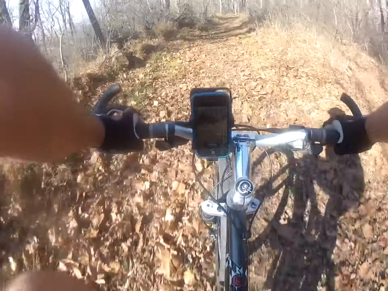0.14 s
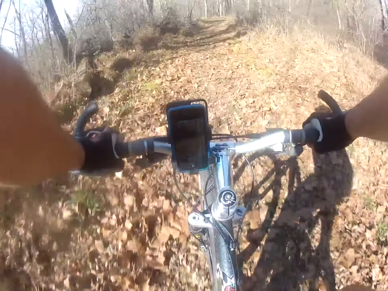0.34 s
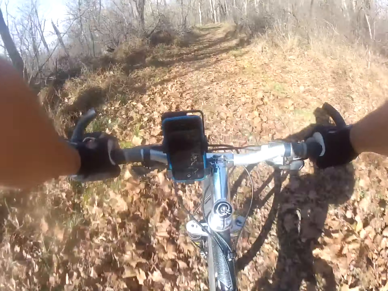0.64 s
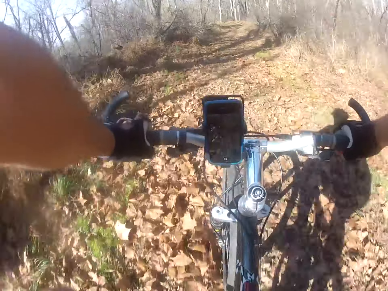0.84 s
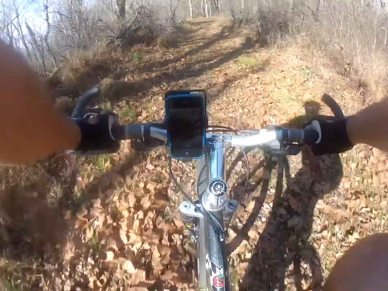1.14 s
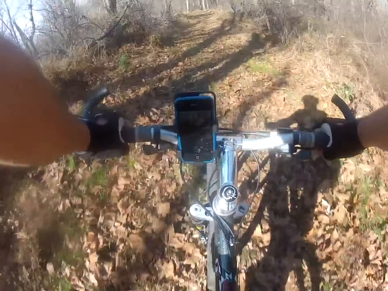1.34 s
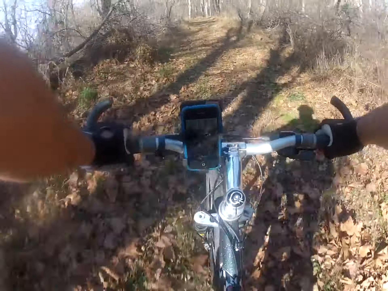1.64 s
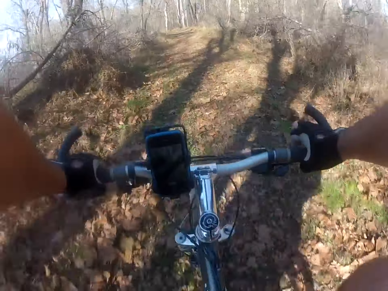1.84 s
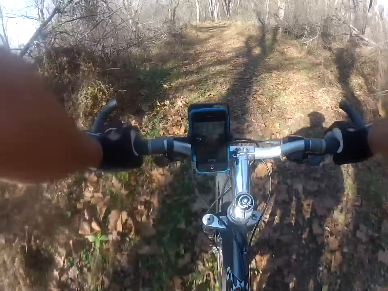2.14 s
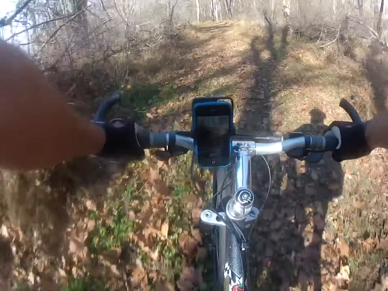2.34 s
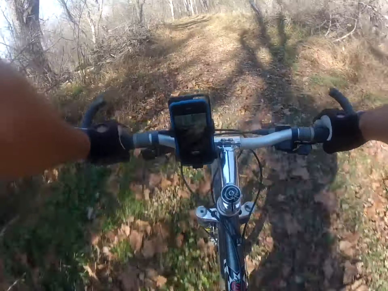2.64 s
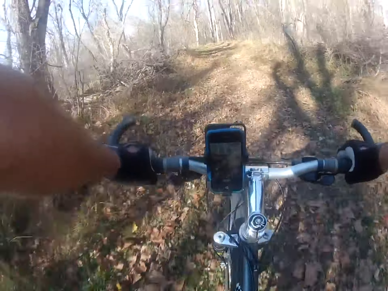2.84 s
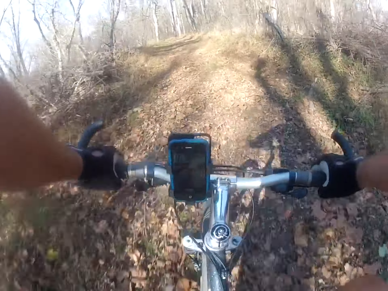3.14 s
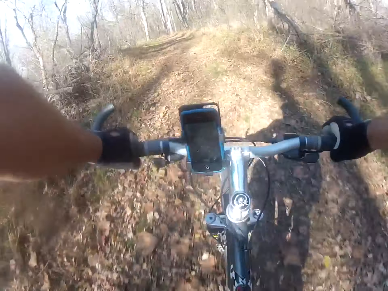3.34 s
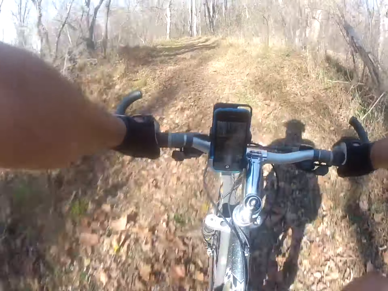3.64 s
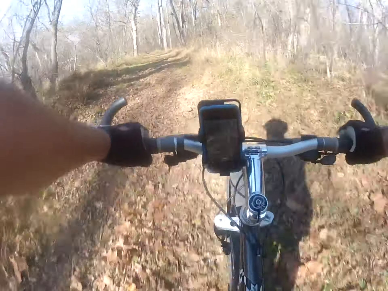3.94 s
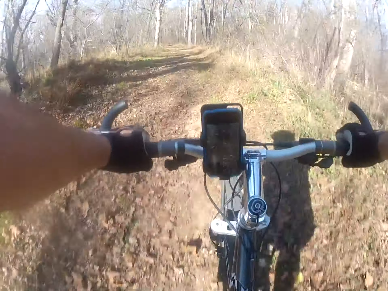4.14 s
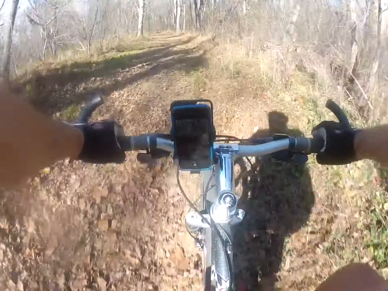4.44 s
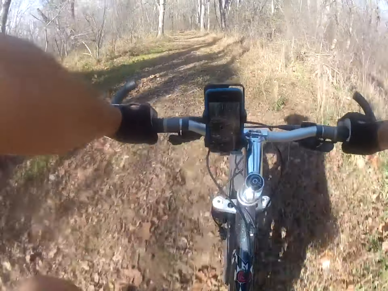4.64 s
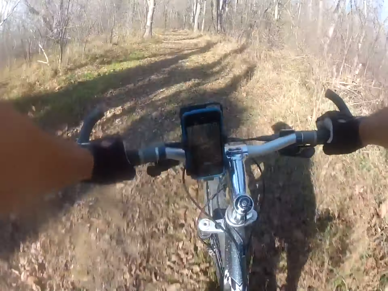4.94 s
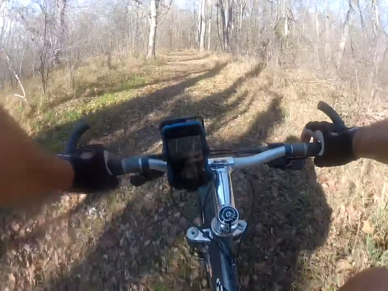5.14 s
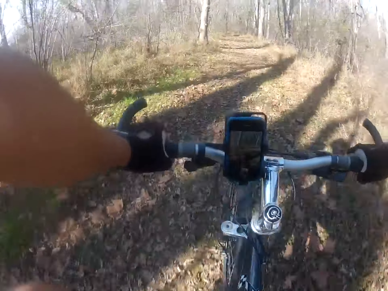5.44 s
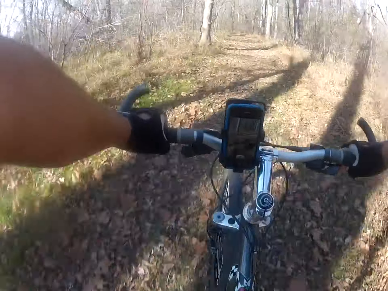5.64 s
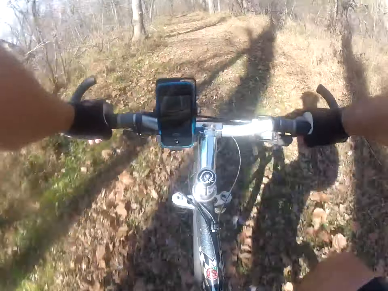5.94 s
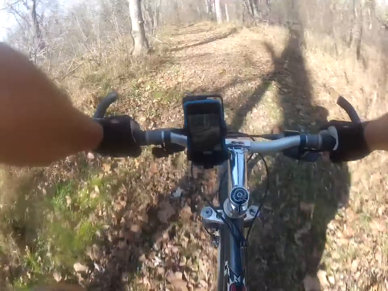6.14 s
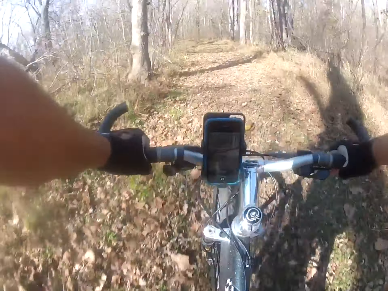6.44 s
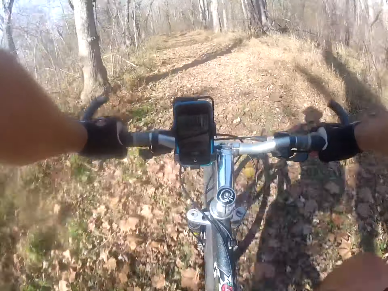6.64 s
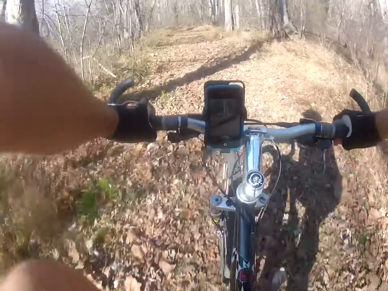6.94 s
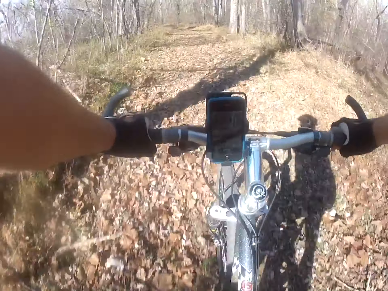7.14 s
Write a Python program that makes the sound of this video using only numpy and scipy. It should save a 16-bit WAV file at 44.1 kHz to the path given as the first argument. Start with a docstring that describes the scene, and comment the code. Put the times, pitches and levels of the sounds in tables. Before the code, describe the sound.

Continuous leaf crackle under a rolling mountain bike, full of fine snaps and irregular heavier crunches. After an opening clack, dull low jolts come at uneven intervals, mostly in the first five seconds. Wind rumbles and puffs on the body-worn camera microphone. The leaves thin out toward the end. Outdoors, close and dry, slightly boxy.

```python
"""Bike on dry leaves

A mountain bike rolls along a woodland trail, heard from a camera on the rider's chest.
Leaves: random impulses in clusters, coloured by the case and a close echo; snaps ring, heaps crunch louder.
Bumps and knocks: damped modes of the mount and of the bike.
Wind on the microphone: filtered noise for the rumble, filtered sparse impulses for the flutter.
"""
import sys
import numpy as np
from scipy import signal
from scipy.fft import rfft, irfft
from scipy.io import wavfile
from scipy.ndimage import uniform_filter1d

SR = 44100
rng = np.random.default_rng(int(sys.argv[2]) if len(sys.argv) > 2 else 0)


def wrap_up_sound(samples):
    """Save the sound to the file named by the first command line argument, as 16-bit audio."""
    columns = np.atleast_2d(samples).T
    # keep every value between -1 and 1, then stretch to whole-number steps
    tamed = np.clip(columns, -1, 1)
    steps = np.round(tamed * 32767).astype(np.int16)
    wavfile.write(sys.argv[1], SR, steps)


N = 321905
TIME = np.arange(N) / SR

# steady crackle as the leaf layer thickens and thins: t/s, level/dB before trim, brightness/dB
LEAF_LAYER = [(0.0, -45, 4.5), (0.56, -46.5, 1), (0.78, -41.5, 3.5), (1.28, -39, 4.5), (1.61, -46.5, 0.2),
              (1.95, -46, 2), (2.18, -43.5, 2.1), (2.56, -47, 2), (2.78, -42, 3), (3.18, -44, 1.5),
              (3.48, -42.5, 0.5), (3.88, -45.5, 0.5), (4.32, -45.5, -3.5), (5.1, -40.5, 2.5),
              (5.55, -46, 2.5), (6.28, -49, -2), (6.87, -46.5, 1), (7.3, -48, 0.3)]
# short lulls in the crackle: t/s, level change/dB
CRACKLE_LULLS = [(0.09, -1), (0.55, -3.5), (0.935, -7), (1.11, -3.5), (1.6, -3), (1.958, -3), (3.12, -3.5),
                 (3.24, -2), (4.3, -5.5), (4.68, -5.5), (5.85, -3.5), (6.04, -4.5), (6.47, -1), (7.2, -6)]
# level of the crackle near 6 kHz: t/s, lift/dB
CRACKLE_6KHZ = [(0.0, -1), (0.4, -2), (0.7, 0.2), (1.9, -2), (2.0, 0.5), (2.5, -3.1), (2.7, 0.5), (3.7, -4),
                (3.8, 1.7), (4.1, -5.8), (4.5, 2.5), (4.7, -5.5), (4.8, 0.8), (6.4, -3.5), (6.8, 0.4),
                (7.3, -4)]


def rolling():
    """Tyres press through the leaf layer: a fine rustle with single snaps standing out."""
    level_db, bright_db = curves(LEAF_LAYER)
    rustle = leaf_crackle(per_second=5500, spread_db=2.0, cluster_db=1.8, cluster_rate=300)
    breaks = leaf_crackle(per_second=8000, spread_db=2.5, cluster_db=-1.85, cluster_rate=500)
    sound = unit(rustle) + undb(-2.5) * snaps(breaks)
    # level, brightness and the 6 kHz band wander from patch to patch
    lull_db = sum(db * hump(s, half_s=0.034) for s, db in CRACKLE_LULLS)
    depth_db = 0.82 * walk(rate=30) + lull_db
    bright_db = bright_db + 2.2 * walk(rate=40)
    lift_db = curves(CRACKLE_6KHZ)[0] + 1.2 * walk(rate=16)
    sound = unit(brighten(sound, bright_db))
    trim_db = -2.67
    return lift_6khz(sound, lift_db) * undb(level_db + depth_db + trim_db)


def snaps(crackle, count=1300, size=1500):
    """Single leaves break: a spurt of cracks that dies in milliseconds, each ringing at its own pitch."""
    out, t = np.zeros(N), np.arange(size) / SR
    low_hz, high_hz = 1775, 15500
    shortest_s, longest_s = 0.0096, 0.014
    for when, pitch, length, strength in rng.random((count, 4)):
        start = int(when * (N - size))
        decay_s = shortest_s + length * (longest_s - shortest_s)
        spurt = crackle[start:start + size] * np.exp(-t / decay_s)
        hz = low_hz * (high_hz / low_hz) ** pitch
        spurt = spurt + undb(19) * pitch_ring(spurt, hz, width_hz=110 + 0.024 * hz)
        add(out, spurt * undb(4.0 * strength ** 3), start / SR)  # few are strong
    return unit(out)


# heaps of leaves crushed at once:
# peak t/s, level/dB before trim, length/s, brightness/dB before scaling, lift near 6 kHz/dB
LEAF_HEAPS = [(0.021, -40, 0.01, 1, -10), (0.148, -39.5, .014, 2.5, 4.5), (0.494, -42, 0.02, 0.5, -3),
              (0.578, -41, 0.0065, -20, 0), (0.757, -44.5, .025, 0.5, 8), (0.88, -43, 0.015, 3, -15),
              (1.005, -37.5, 0.051, 1, 0.5), (1.047, -37.5, 0.014, 1.5, -6), (1.237, -37.5, 0.029, 6.5, -2),
              (1.347, -38.5, 0.0062, 6.5, -3), (1.389, -39, 0.011, 3.5, -1), (1.539, -43.5, 0.015, 5.5, 0),
              (1.647, -40.5, 0.0074, 3.5, -4), (1.684, -41, 0.014, 0.5, -3),
              (1.746, -39, 0.0093, -0.5, 0.5), (1.846, -47, .008, 8, -3), (1.996, -41.5, .007, 18, 3),
              (2.031, -43, 0.0075, 11.5, -2), (2.079, -40, 0.011, 7, 6), (2.283, -46, 0.013, 7.5, 1),
              (2.358, -44, 0.009, 3, 5), (2.66, -46.5, 0.043, -6, 13), (2.777, -43.5, 0.033, 6, 0),
              (2.869, -46, .016, -1, 14), (2.953, -45, 0.023, 4, -9), (3.171, -47.5, .024, 9, 11),
              (3.322, -43.5, 0.048, 8, 0), (3.425, -39, 0.016, 6, -1), (3.463, -39.5, 0.038, 3, 1),
              (3.601, -47, 0.022, -8, 3), (3.767, -40.5, 0.018, -1, 4), (4.156, -41, 0.0041, 4, -9),
              (4.169, -40, 0.005, 5.5, -13), (4.352, -46, 0.0046, -9, -12), (4.426, -37.5, 0.0073, -1.5, 3),
              (4.455, -40, 0.021, 2, 1.5), (4.597, -41.5, .013, 4, -1), (4.715, -44.5, 0.013, 8.5, -4),
              (4.778, -43, .005, 5, 1), (4.887, -36, 0.016, 0, 2), (5.005, -43, .012, 0, -1),
              (5.181, -36.5, 0.0079, 3, -2), (5.26, -42.5, 0.027, -8, 6), (5.671, -46, 0.0063, 13, -9),
              (5.727, -44.5, 0.011, -11, 7), (5.892, -46, 0.01, -6, 10), (5.927, -51, 0.01, 9, 5),
              (6.011, -50.5, 0.0068, 15, -12), (6.196, -50.5, 0.022, 1, 8), (6.396, -41, 0.023, 5.5, -8),
              (6.416, -37.5, 0.011, 6.5, -6), (6.698, -42, 0.0043, 1, -1), (6.796, -47.5, 0.01, 2, 12),
              (6.866, -47, .012, -2, 12), (6.938, -41, 0.0059, 6, -6), (6.971, -45, 0.0051, 5, -7)]


def crunches(size=6000):
    """A heap gives way: the cracks swell fast, ring at one pitch and die more slowly."""
    out, lead_s = np.zeros(N), size / 3 / SR
    t = np.arange(size) / SR - lead_s
    crackle = leaf_crackle(per_second=9800, spread_db=3.5, cluster_db=-0.2, cluster_rate=210)
    # light leaves give little low sound
    crackle = signal.sosfilt(signal.butter(1, 645, "highpass", fs=SR, output="sos"), crackle)
    bright_scale, trim_db = 1.9, -0.12
    for s, db, length_s, bright_db, lift_db in LEAF_HEAPS:
        start = rng.integers(N - size)
        rise = (t / (0.48 * length_s)) ** 2
        fall = np.abs(t / length_s) ** 1.8
        swell = np.exp(-np.where(t < 0, rise, fall))
        heap = brighten(crackle[start:start + size], bright_scale * bright_db)
        heap = lift_6khz(heap, lift_db)
        # brighter heap: higher ring; more lift near 6 kHz: weaker ring
        hz = 1780 * 2 ** (0.11 * max(bright_db, 0))
        ring_db = 0.5 - 0.56 * lift_db
        heap = (heap + undb(ring_db) * pitch_ring(heap, hz, width_hz=420)) * swell
        swell_rms = np.sqrt(np.mean(swell ** 2))
        add(out, unit(heap) * swell_rms * undb(db + trim_db), s - lead_s)
    return out


# broad colour of a crack inside the camera case: f/Hz, level/dB
CRACK_SPECTRUM = [(150, -0.5), (600, -3.5), (1500, -2), (1900, -2.5), (3500, 0), (4900, -9.5),
                  (6000, -12.5), (7300, -10.5), (8600, -5), (10200, -12), (11300, -27.5), (12700, -27),
                  (13800, -12), (15200, -9)]
# peaks in the crackle's colour, from the case and a close echo: f/Hz, width/Hz, lift/dB
CRACK_PEAKS = [(1100, 130, 7), (1390, 110, 3), (1835, 250, 12), (2220, 260, 8), (2540, 90, 5.5),
               (2835, 120, 6), (3210, 200, 6.5), (3550, 170, 5.5), (4500, 260, 4.5), (5260, 260, 5),
               (6750, 190, 4), (8440, 140, 5), (8800, 130, 3), (9170, 100, 4), (9480, 100, 4),
               (9790, 120, 4), (10140, 190, 8), (13830, 170, 3), (14550, 120, 3), (14830, 130, 4),
               (15200, 130, 4)]


def leaf_crackle(per_second, spread_db, cluster_db, cluster_rate):
    """Clustered cracks of dry leaves, coloured by the camera case and a close echo."""
    return colour(cracks(per_second, spread_db, cluster_db, cluster_rate), CRACK_SPECTRUM, CRACK_PEAKS)


def cracks(per_second, spread_db, cluster_db, cluster_rate):
    """Random impulses of unequal size and sign; a random wander of level bunches them."""
    happens = rng.random(N) < per_second / SR
    size = undb(spread_db * np.minimum(rng.exponential(size=N), 4.5))
    sign = np.sign(rng.standard_normal(N))
    return happens * sign * size * undb(cluster_db * walk(cluster_rate))


def pitch_ring(sound, hz, width_hz):
    """One resonator: the sound rings briefly at a single pitch."""
    b, a = signal.iirpeak(min(hz, .4 * SR), hz / width_hz, fs=SR)
    return signal.lfilter(b, a, sound)


def brighten(sound, bright_db, split_hz=2550):
    """Spectral tilt: dull from thick leaves, bright from brittle ones."""
    dull = signal.sosfiltfilt(signal.butter(2, split_hz, fs=SR, output="sos"), sound)
    return dull * undb(-bright_db / 2) + (sound - dull) * undb(bright_db / 2)


def lift_6khz(sound, lift_db, low_hz=4200, high_hz=7700):
    """Raise or lower the band around 6 kHz."""
    band = signal.butter(3, [low_hz, high_hz], "bandpass", fs=SR, output="sos")
    thin = signal.sosfiltfilt(band, sound)
    return sound + thin * (undb(lift_db) - 1)


# bumps in the trail: t/s, peak level/dB, contact/s (long = soft)
TRAIL_BUMPS = [(0.12, -38, 0.0076), (0.536, -36.5, 0.015), (0.703, -26.5, 0.0014), (0.976, -32.5, 0.0048),
               (1.013, -33, .002), (1.374, -32.5, 0.017), (1.643, -34, .002), (1.901, -28.5, 0.0033),
               (3.229, -28.5, 0.0034), (3.669, -36.5, 0.01), (3.911, -31, 0.0085), (4.204, -31.5, .0015),
               (4.225, -29.5, 0.00046), (4.618, -30.5, 0.0021), (6.383, -37, 0.015), (7.202, -37, 0.0092)]
# damped ring of the mount: nominal f/Hz, level/dB, t60/s
MOUNT_RING = [(97, 4.5, 0.032), (155, 4.5, 0.025), (335, 3, 0.01), (620, -14, 0.013)]


def thuds():
    """Trail bumps jolt the mount: low, heavily damped modes, retuned at each bump."""
    return sum(strike([(s, db)], MOUNT_RING, contact_s, detune=0.16) for s, db, contact_s in TRAIL_BUMPS)


# hard knocks on the bike: t/s, peak level/dB
BIKE_KNOCKS = [(.0373, -20), (.706, -37), (.758, -39)]
# ring of a knock: nominal f/Hz, level/dB, t60/s
KNOCK_RING = [(248, 8.5, 0.011), (385, -48, 0.018), (1155, -2, 0.082), (1310, 6, 0.016), (1696, 12, 0.015),
              (1783, -4, 0.071), (2180, -21, .015), (3070, -12, .015), (10400, 2, 0.011),
              (13600, -6, 0.016)]


def knocks():
    """Short hard contacts ring the modes of the bike."""
    return strike(BIKE_KNOCKS, KNOCK_RING, contact_s=.0006, detune=.002)


# steady air on the microphone: t/s, rumble level/dB before trim, flutter level/dB before trim
AIR_FLOW = [(0.0, -37, -49.5), (0.8, -36, -46.5), (1.25, -36.5, -53), (1.8, -32.0, -48), (2.5, -40, -48.5),
            (3.6, -39.5, -47), (4.15, -36, -47.5), (5.15, -39.5, -50), (5.75, -47, -50.5), (6.05, -39, -49),
            (6.3, -44, -50), (6.8, -35.5, -46.5), (7.3, -45.5, -51.5)]
# single buffets: peak t/s, rumble level/dB, flutter level/dB
AIR_BUFFETS = [(0.35, -30, -57), (0.79, -33, -50.5), (1.04, -30.5, -46), (1.55, -28.5, -54),
               (1.68, -28, -55), (2.22, -37, -55), (2.65, -33.5, -42), (2.85, -30, -62), (3.15, -30.5, -54),
               (4.16, -40, -41), (4.31, -34, -44), (4.73, -36, -48.5), (4.88, -30, -52), (5.151, -34, -46),
               (5.57, -45, -53), (5.99, -33.5, -51), (6.83, -47, -52)]
# slow rumble: f/Hz, level/dB
RUMBLE_SPECTRUM = [(6, -29.5), (14, -4.5), (25, 0), (45, -7.5), (80, -19.5), (140, -33), (300, -67)]
# quicker flutter: f/Hz, level/dB
FLUTTER_SPECTRUM = [(40, -10.5), (90, 1), (160, -1.5), (240, -10), (400, -16.5), (600, -35), (1200, -36),
                    (3000, -83)]


def wind():
    """Large eddies rumble and now and then buffet; small ones hit the microphone as soft puffs."""
    rumble_db, flutter_db = curves(AIR_FLOW)
    half_s, rumble_trim_db, flutter_trim_db = 0.028, -1.5, -3.34
    push = sum(undb(db) * hump(s, half_s) for s, db, _ in AIR_BUFFETS)
    flap = sum(undb(db) * hump(s, half_s) for s, _, db in AIR_BUFFETS)
    eddies = rng.standard_normal(N) * undb(1.27 * walk(rate=25))
    rumble = unit(colour(eddies, RUMBLE_SPECTRUM))
    puffs = cracks(per_second=450, spread_db=0.5, cluster_db=1.56, cluster_rate=40)
    puffs = unit(colour(puffs, FLUTTER_SPECTRUM))
    # steady and buffet levels add in power
    rumble_gain = np.hypot(undb(rumble_db + rumble_trim_db), push)
    flutter_gain = np.hypot(undb(flutter_db + flutter_trim_db), flap)
    return rumble * rumble_gain + puffs * flutter_gain


def strike(events, modes, contact_s, detune, size=8192):
    """Each blow rings damped modes, scaled to its peak; a longer contact softens the attack."""
    out, t = np.zeros(N + size), np.arange(size) / SR
    attack = 1 - np.exp(-(t / contact_s) ** 2)
    for s, db in events:
        stretch = np.exp(detune * rng.standard_normal(len(modes)))
        ring = np.zeros(size)
        for (hz, mode_db, t60_s), k in zip(modes, stretch):
            decay = np.exp(-np.log(1000) * t / t60_s)
            ring += undb(mode_db) * np.sin(2 * np.pi * hz * k * t) * decay
        ring = ring * attack
        start = max(int(s * SR), 0)
        out[start:start + size] += undb(db) * ring / np.abs(ring).max()
    return out[:N]


def colour(x, points, peaks=(), size=8192):
    """Minimum-phase filter: a broad spectrum with peaks standing on it."""
    hz = np.maximum(np.fft.rfftfreq(size, 1 / SR), 1)
    knots_hz, knots_db = np.transpose(points)
    db = np.interp(np.log(hz), np.log(knots_hz), knots_db)
    for centre_hz, width_hz, lift_db in peaks:
        db = db + lift_db / (1 + (2 * (hz - centre_hz) / width_hz) ** 2)
    # fold the cepstrum to make the filter causal
    cepstrum = irfft(np.log(undb(db)))
    cepstrum[1:size // 2] *= 2
    cepstrum[size // 2 + 1:] = 0
    impulse = irfft(np.exp(rfft(cepstrum)))
    return signal.fftconvolve(x, impulse)[:N]


def undb(db):
    """Decibels to gain."""
    return 10 ** (np.asarray(db) / 20)


def unit(x):
    """Scale to an rms of one."""
    return x / np.sqrt(np.mean(x ** 2))


def curves(table):
    """Each column after t/s as a control over time, joined by straight lines."""
    s, *columns = np.transpose(table)
    return [np.interp(TIME, s, c) for c in columns]


def walk(rate):
    """Smooth random wander with an rms of one; rate = new values per second."""
    hold = max(int(SR / rate), 1)
    steps = rng.standard_normal(N)[np.arange(N) // hold]
    return unit(uniform_filter1d(steps, hold))


def hump(s, half_s):
    """Smooth rise and fall peaking at time s; 1/e at half_s either side."""
    return np.exp(-((TIME - s) / half_s) ** 2)


def add(out, sound, s):
    """Mix a short sound in from time s on, cropped to the scene."""
    start = int(s * SR)
    sound = sound[max(-start, 0):max(N - start, 0)]
    out[max(start, 0):max(start, 0) + len(sound)] += sound


def scene():
    """Sum of leaves under the tyres, jolts of the bike and wind; one channel."""
    return (rolling() + crunches() + thuds() + knocks() + wind())[None]


def record(dry):
    """The camera cuts the top: steep elliptic low-pass."""
    top_hz, ripple_db, stop_db = 15280, .2, 80
    return signal.sosfilt(signal.ellip(10, ripple_db, stop_db, top_hz, fs=SR, output="sos"), dry)


dry = scene()
out = record(dry)
wrap_up_sound(out)
```